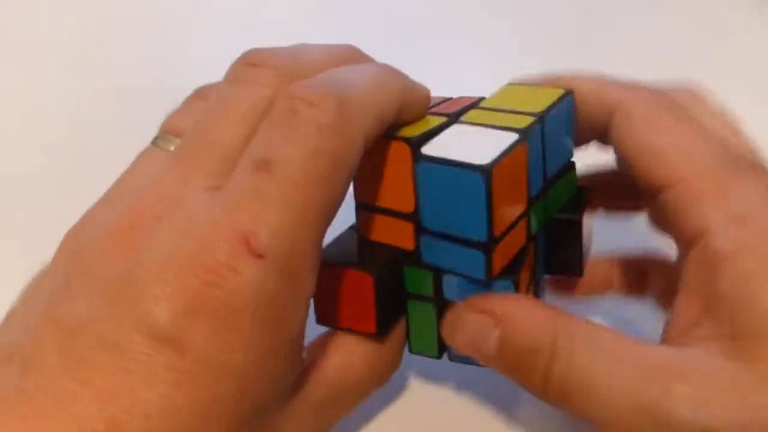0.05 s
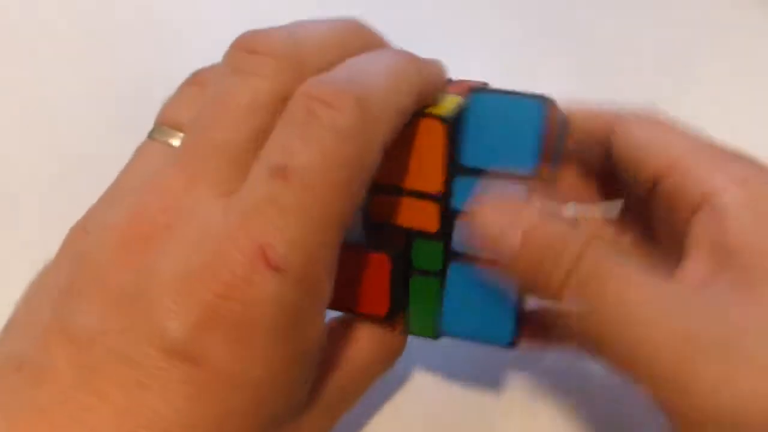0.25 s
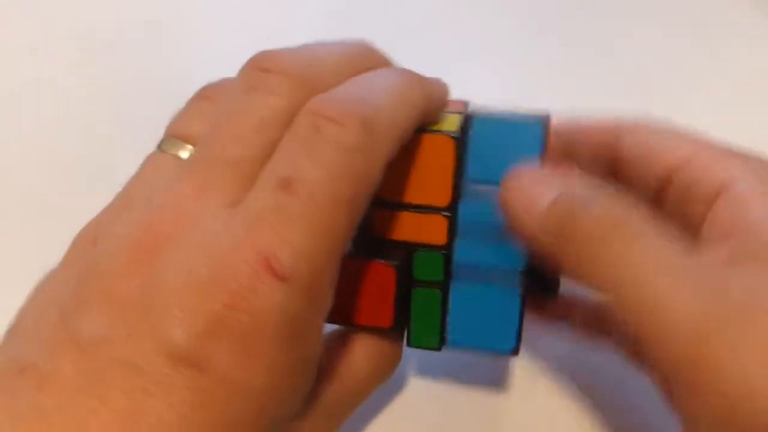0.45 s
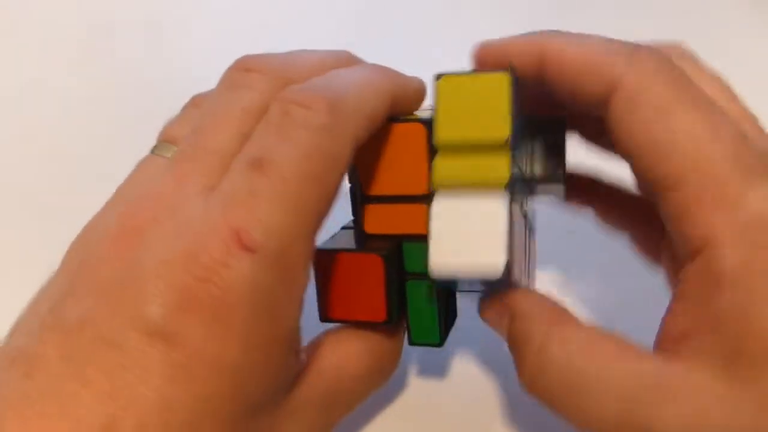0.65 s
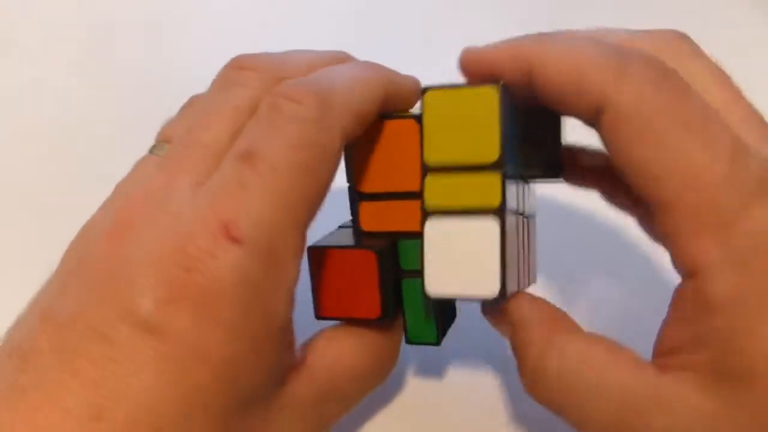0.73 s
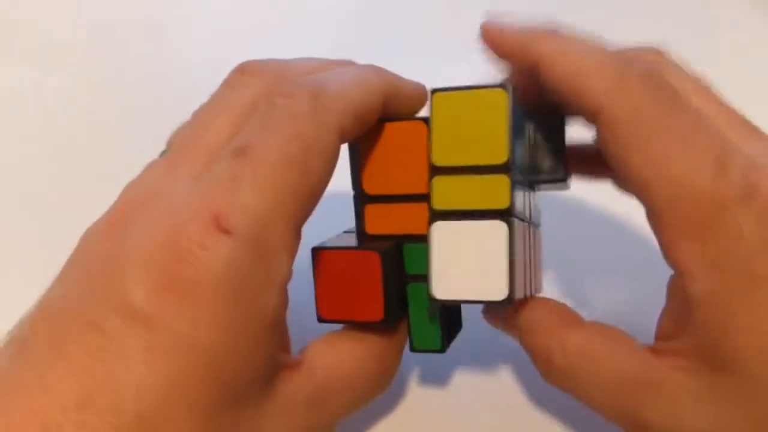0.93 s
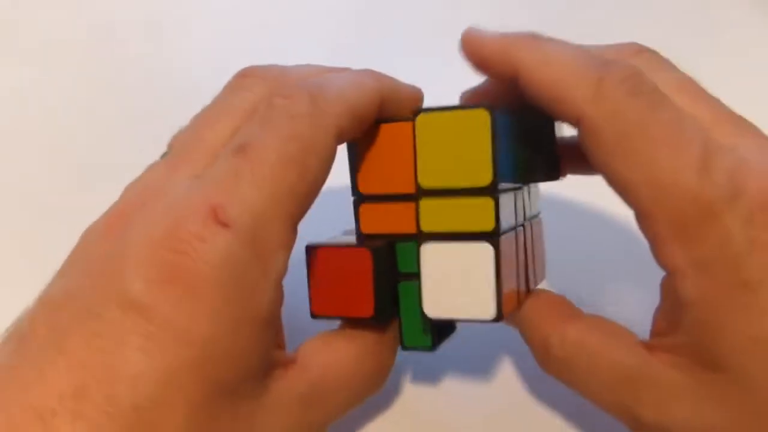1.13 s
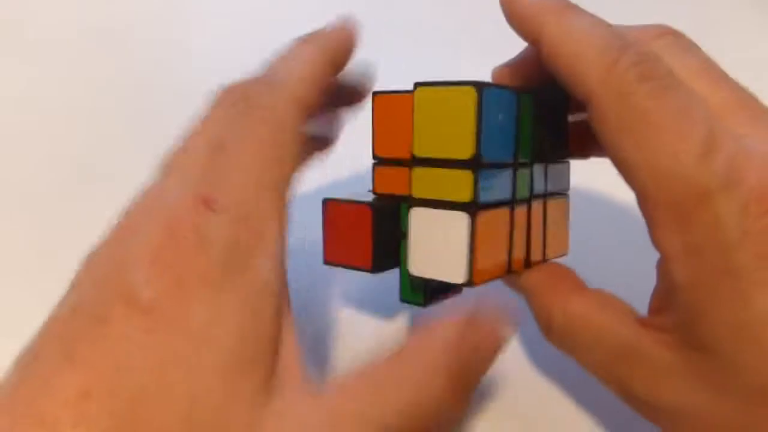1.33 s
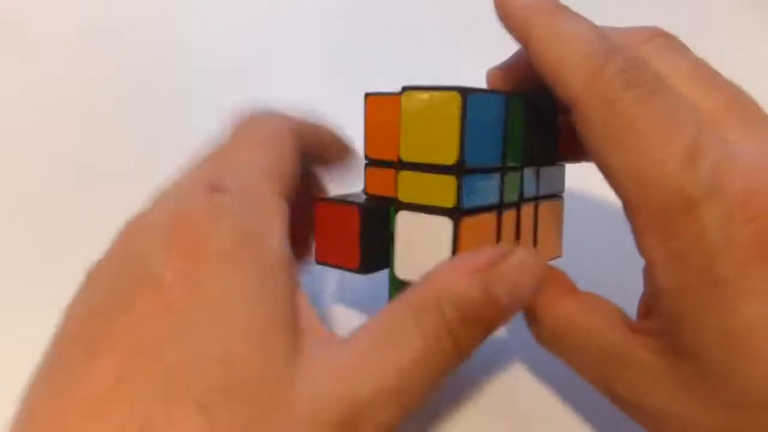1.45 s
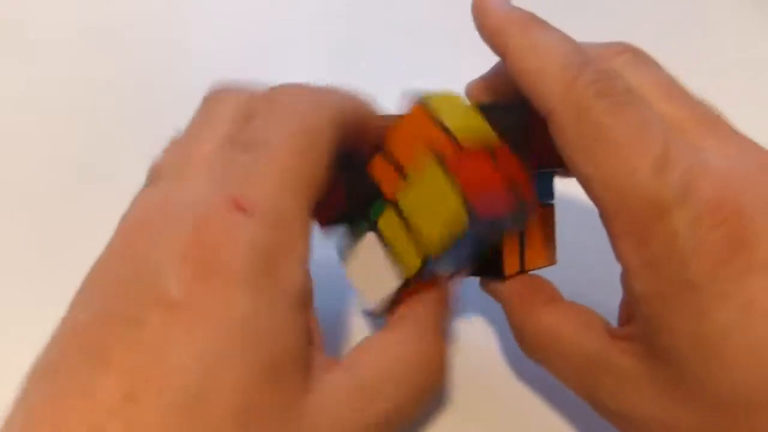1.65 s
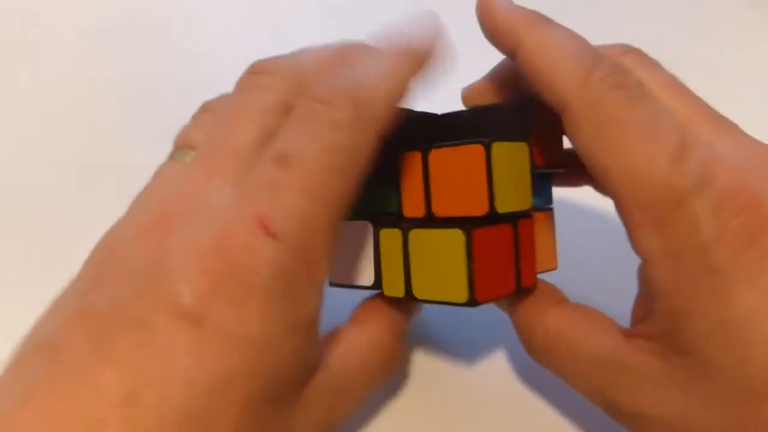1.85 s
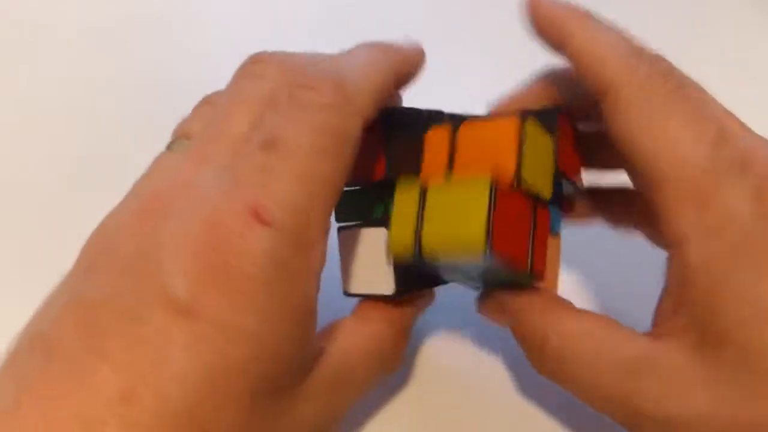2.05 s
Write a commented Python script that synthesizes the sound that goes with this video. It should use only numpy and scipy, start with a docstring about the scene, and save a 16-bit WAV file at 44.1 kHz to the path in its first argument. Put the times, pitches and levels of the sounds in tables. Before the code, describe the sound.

Quick dry clicks and gritty scrapes of plastic puzzle layers build to a sharp clack, pause with light ticks and a soft finger brush, then a second twist snaps; heard close in a quiet room.

```python
"""A plastic twisty puzzle turned in two hands over a table in a quiet room, just in front of a camera.
For 0.75 s hollow pieces click, ringing in three mode groups, and layers scrape in tiny slips; a hard snap at 0.55 s.
Sparse clicks follow; near 1.4 s a finger brushes a face as a swell of hiss; from 1.54 s a second turn snaps at 1.81 s.
A few clicks close it. Three snaps push low on the table; a short room tail and steady air noise lie behind it all."""
import sys
import numpy as np
from scipy import signal
from scipy.fft import rfft, irfft, next_fast_len
from scipy.io import wavfile
from scipy.ndimage import uniform_filter1d, map_coordinates

SR = 44100
rng = np.random.default_rng(int(sys.argv[2]) if len(sys.argv) > 2 else 0)


def wrap_up_sound(samples):
    """Save the sound to the file named by the first command line argument, as 16-bit audio."""
    columns = np.atleast_2d(samples).T
    # keep every value between -1 and 1, then stretch to whole-number steps
    tamed = np.clip(columns, -1, 1)
    steps = np.round(tamed * 32767).astype(np.int16)
    wavfile.write(sys.argv[1], SR, steps)


def ratio(d):
    """dB to gain"""
    e = np.asarray(d, float) / 20
    return 10 ** e


N = 92610


def unit(x):
    """Scale to rms 1."""
    return x / np.sqrt(np.mean(x ** 2) + 1e-20)


def along(points, hz, column=1):
    """Read a column of (frequency [Hz], value, ..) points on a log frequency axis."""
    rows = np.array(points)
    return np.interp(np.log(hz + 1), np.log(rows[:, 0] + 1), rows[:, column])


def filtered(x, response):
    """Filter x by a complex response of frequency."""
    n = x.shape[-1]
    m = next_fast_len(2 * n)
    return irfft(rfft(x, m) * response(np.fft.rfftfreq(m, 1 / SR)), m)[..., :n]


def noise(spectrum):
    """Coloured noise of rms 1."""
    return unit(filtered(rng.standard_normal(N), lambda hz: ratio(along(spectrum, hz))))


def bandpass(f, centre_hz, width_hz):
    """Response of one resonance, 1 at its centre."""
    damping = 1j * f * width_hz
    return damping / (centre_hz ** 2 - f ** 2 + damping)


def pieces(f):
    """Small hollow pieces: three groups of resonances, cut steeply in the bass and gently in the treble."""
    # modes of the pieces, low to high group: (frequency [Hz], width [Hz], level [dB])
    low_modes = [(450, 200, -7.5), (620, 67, -11.5), (810, 170, -11.5), (976, 158, 10), (1375, 210, 9.5),
                 (1590, 220, 2.5)]
    middle_modes = [(2230, 350, -2.5), (2584, 330, 2.5), (3420, 900, -2), (4237, 1100, 0.5),
                    (5050, 270, -6)]
    high_modes = [(6930, 1020, 3.5), (8020, 640, -5), (9830, 1200, -8.5), (11200, 1200, -14),
                  (12800, 680, -21)]
    low_cut_hz, high_cut_hz = 390, 10500  # small pieces radiate little under the first
    ring = [sum(ratio(db) * bandpass(f, hz, width) for hz, width, db in group)
            for group in (low_modes, middle_modes, high_modes)]
    s = 1j * f / low_cut_hz
    bass_cut = (s * s / (s * s + s + 1)) ** 2
    treble_cut = 1 / (1 + 1j * f / high_cut_hz) ** 2
    return np.array(ring) * bass_cut * treble_cut


def spread():
    """Gains of mid and side for each mode group; the side widens towards the treble."""
    side_db = [-21.5, -14, -10.5]
    return ratio([[0, 0, 0], side_db])[..., None]


def clicks():
    """Each contact chatters briefly and rings the three mode groups; a second draw is what differs left to right."""
    # clicks: (time [s], level of low, middle and high modes [dB],
    #          frequency most excited among the low [Hz] and among the middle modes [Hz])
    click_rows = [(0.0128, -40.5, -39, -44, 1430, 5200), (0.0214, -43.5, -35.5, -47, 1500, 3540),
                  (0.0975, -43.5, -48, -49, 1600, 3280), (0.1005, -47, -42.5, -51, 1490, 4400),
                  (0.1728, -55, -54, -58, 1300, 3000), (0.2002, -41, -57, -36, 1490, 3940),
                  (0.2035, -48, -25, -35, 1620, 4230), (0.2156, -31, -35, -45, 1110, 3020),
                  (0.22, -43, -28, -33, 1220, 3850), (0.2297, -33, -36, -25, 1330, 3810),
                  (0.2436, -30.5, -38, -45, 1500, 2690), (0.2473, -43, -59, -43, 1490, 3900),
                  (0.2568, -34.5, -35, -62, 1470, 2570), (0.265, -59, -39, -62, 1480, 2800),
                  (0.2712, -65, -36, -71, 1400, 3200), (0.2896, -54, -52, -65, 1620, 3530),
                  (0.3112, -61, -56, -48, 1410, 2560), (0.319, -42, -52, -38, 1130, 4600),
                  (0.3229, -37, -25.5, -51, 1600, 3720), (0.3611, -45.5, -43, -52, 1480, 2900),
                  (0.3909, -41, -31, -35, 1380, 2880), (0.398, -25, -20, -31, 1650, 3250),
                  (0.415, -21.5, -32.5, -40, 1670, 3150), (0.4337, -69, -48, -64, 1260, 3330),
                  (0.4536, -42, -48, -58, 1360, 2750), (0.4575, -58, -52, -54, 1060, 3590),
                  (0.463, -62, -59, -64, 1460, 3240), (0.4732, -32, -38.5, -55, 1300, 2430),
                  (0.4792, -40.5, -44, -61, 1630, 2400), (0.4917, -35, -39.5, -44, 1660, 4150),
                  (0.5158, -35.5, -28.5, -48, 1170, 4700), (0.5339, -38, -31.5, -45, 910, 2930),
                  (0.5424, -26.5, -35, -44, 1510, 3420), (0.5494, -20.5, -11, -15.5, 1270, 3750),
                  (0.5823, -30, -35, -39, 1190, 3570), (0.5988, -26, -30.5, -39, 1500, 2500),
                  (0.6023, -24.5, -34, -38, 1400, 2300), (0.6282, -65, -56, -53, 1100, 2620),
                  (0.641, -44.5, -58, -54, 1240, 3360), (0.6684, -41.5, -52, -55, 1200, 2340),
                  (0.6904, -37.5, -43.5, -54, 1400, 2860), (0.7238, -56, -50, -54.5, 870, 3400),
                  (0.7368, -42, -44, -61, 1640, 2270), (0.8683, -41.5, -43.5, -53.5, 1140, 2800),
                  (0.8751, -46, -66, -68, 1050, 3400), (0.9755, -55, -54, -68, 1120, 3420),
                  (1.0158, -58, -52, -60, 1300, 2960), (1.046, -47.5, -57, -54, 1440, 2640),
                  (1.0516, -54, -45, -52, 1320, 2820), (1.1974, -49, -55, -61, 1600, 3270),
                  (1.2034, -52, -42.5, -73, 1370, 2390), (1.2142, -50.5, -42.5, -77, 1560, 3370),
                  (1.5356, -41.5, -44.5, -46.5, 960, 3420), (1.5465, -58, -56, -59, 1380, 3500),
                  (1.5771, -44, -42.5, -42, 930, 4050), (1.5885, -42.5, -41, -46, 950, 2630),
                  (1.6483, -52, -56, -48, 1540, 3930), (1.652, -43.5, -37.5, -40.5, 970, 4430),
                  (1.6681, -34, -49, -40, 980, 3580), (1.6746, -39, -62, -52, 1010, 2640),
                  (1.6805, -64, -41, -55, 1360, 2500), (1.6953, -44, -56, -33.5, 1210, 4270),
                  (1.7159, -49, -37.5, -44, 1110, 2930), (1.7343, -48, -62, -52, 1050, 3520),
                  (1.7592, -46.5, -48, -45, 1020, 2620), (1.7895, -52, -42, -44, 1500, 2900),
                  (1.8055, -27, -22, -40.5, 950, 3880), (1.8077, -20.5, -23.5, -21, 1010, 3260),
                  (1.9536, -45.5, -40, -42, 1500, 3500), (2.0107, -42, -50, -54, 1140, 3930),
                  (2.061, -53, -49, -51, 1450, 2850), (2.0734, -63, -40.5, -53, 1290, 3910)]
    rise_s, t60_s = 0.00053, [0.0027, 0.0088, 0.0096]  # chatter of one contact; decay for each mode group
    strike = 2.9  # first touch over the chatter's rms, in the mid alone
    lead_s = .0004  # a contact starts this long before its listed time
    focus_widths = [1, 0.66]  # band a contact favours in the low and middle groups, over its centre
    unfocused = 0.11  # share that reaches all modes of these groups

    rows, t = np.array(click_rows), np.arange(1024) / SR
    first_touch = np.arange(len(t)) == round(2 * rise_s * SR)
    # axes: contact, mid and side, mode group, time
    touch = rng.standard_normal((len(rows), 2, 1, len(t)))
    touch = touch + np.reshape([strike, 0], (2, 1, 1)) * first_touch
    decay = ratio(-60 * t / np.array(t60_s)[:, None])
    chatter = touch * (1 - np.exp(-t / rise_s)) * decay

    def focus(f):
        """A contact's favoured bands; its high group is excited evenly."""
        centres = rows[:, 4:].T[..., None]
        bands = [unfocused + bandpass(f, hz, hz * width) ** 2 for hz, width in zip(centres, focus_widths)]
        return np.stack(bands + [np.ones((len(rows), len(f)))], axis=1)

    rings = filtered(chatter, lambda f: pieces(f) * focus(f)[:, None])
    # the levels refer to the strongest 2 ms of each ring
    peak_power = np.abs(uniform_filter1d(rings ** 2, size=88)).max(-1, keepdims=True)
    levels = ratio(rows[:, None, 1:4, None])
    sound = (rings / np.sqrt(peak_power) * levels * spread()).sum(2)
    out = np.zeros((2, N + len(t)))
    for s, one in zip(rows[:, 0], sound):
        out[:, round((s - lead_s) * SR):][:, :len(t)] += one
    return out[:, :N]


def scrape():
    """Clumped tiny slips between turning layers ring the same modes; in the treble they blur into hiss."""
    # turning layers, before clumping:
    # (time [s], rattle of low modes [dB], middle over low modes [dB], treble hiss [dB])
    scrape_course = [(0, -54, 4, -63), (0.023, -52, -9, -60.5), (.05, -68.5, 3, -69), (.16, -73.5, 6, -71),
                     (0.194, -54, 2, -71), (.205, -56.5, 0, -62), (.225, -46, 11.5, -57),
                     (0.248, -39, -1.5, -68), (.275, -59.5, 8.5, -59), (.325, -47, 4, -53.5),
                     (0.354, -58.5, 10, -65), (.388, -49.5, -29, -64), (0.393, -35, -25, -45),
                     (0.426, -48.5, -2, -65), (.44, -59, -5, -62), (.48, -46, -7, -58),
                     (.505, -55, 5.5, -60), (0.542, -46, 0.5, -51), (.575, -45.5, 4.5, -53),
                     (.61, -51.5, 7, -50), (.64, -51, -3, -56), (.68, -71, 18.5, -66.5),
                     (0.721, -60, 3.5, -62), (.79, -70.5, 2.5, -79), (.96, -71, 0, -77),
                     (.985, -68, 12, -71), (1.01, -85, 10, -72.5), (1.055, -67.5, 19.5, -69),
                     (1.09, -64, -9, -90), (1.185, -74, 0, -78), (1.215, -58, 8, -75), (1.26, -77, -8, -88),
                     (1.51, -97, 0, -79), (1.54, -50.5, 5, -69), (1.563, -70, 9, -57),
                     (1.588, -45.5, -0.5, -61.5), (1.636, -66, -2, -72), (1.652, -54.5, 13, -68),
                     (1.67, -45.5, -7.5, -62), (1.705, -49, 6, -63), (1.745, -53.5, -13, -53),
                     (1.802, -44, 2.5, -63), (1.83, -64, 17.5, -73), (1.9, -64.5, -1.5, -72),
                     (1.95, -82, 4, -78), (1.965, -59, -2, -78), (2.029, -64.5, 3.5, -73),
                     (2.071, -48, -7.5, -56), (2.1, -54, 2, -62)]
    slips_per_s, slip_spread_db = 1800, 4
    clumps_per_s, clump_db = 150, 2.5  # rate and depth of the random level wander
    hiss_grit = 0.25  # share of single slips in the hiss, over the noise

    t, (s, *columns) = np.arange(N) / SR, np.transpose(scrape_course)
    low_db, middle_over_low_db, hiss_db = [np.interp(t, s, c) for c in columns]
    happens = rng.random((2, 1, N)) < slips_per_s / SR
    strength = ratio(slip_spread_db * rng.standard_normal((2, 1, N)))
    slips = happens * strength * np.sign(rng.standard_normal((2, 3, N)))
    slips[:, 2] = hiss_grit * unit(slips[:, 2]) + rng.standard_normal((2, N))
    # a smooth curve through random knots, one for each mode group
    knots = rng.standard_normal((3, 400))
    clump = map_coordinates(knots, np.meshgrid(range(3), t * clumps_per_s, indexing="ij"))
    groups = np.array([[unit(g) for g in side] for side in filtered(slips, pieces)])
    level_db = np.array([low_db, low_db + middle_over_low_db, hiss_db]) + clump_db * clump
    return (groups * ratio(level_db) * spread()).sum(1)


def brush():
    """A finger on a face: a soft swell of skin hiss."""
    # swell of the brush: (time [s], level [dB])
    brush_swell = [(1.35, -75), (1.38, -58), (1.406, -56.5), (1.43, -59), (1.46, -78)]
    # spectrum of skin on plastic: (frequency [Hz], density [dB per Hz])
    skin_spectrum = [(600, -32), (1200, -6), (3500, -5), (8000, -4), (13000, -9), (16000, -11)]
    s, db = np.transpose(brush_swell)
    return ratio(np.interp(np.arange(N) / SR, s, db, -120, -120)) * noise(skin_spectrum)


def thumps():
    """The hardest snaps push once on the table: a low tone that swells fast and dies away."""
    # low pushes through the table: (time [s], level [dB])
    push_rows = [(.40, -63), (.54, -72), (1.808, -57)]
    tone_hz, t60_s, rise_s = 44.7, 0.068, .006
    times, levels_db = np.array(push_rows).T[..., None]
    t = np.arange(N) / SR
    away = np.abs(t - times)  # seconds to or from the peak
    shape = np.where(t > times, ratio(-60 * away / t60_s), np.exp(-away / rise_s))
    return (ratio(levels_db) * shape * np.cos(2 * np.pi * tone_hz * away)).sum(0)


def room(x):
    """Mid and side tails of noise, each frequency dying at its own speed, drawn anew every 50 ms."""
    # decay of the room: (frequency [Hz], t60 [s], starting level [dB])
    room_decay = [(500, 0.15, -4), (1300, 0.095, -1), (3500, 0.11, -1), (9000, 0.11, -3), (15000, 0.2, 0)]
    mid_db, side_db, delay_s = -5, -12.5, .002
    hop = SR // 20
    out = np.zeros((2, N + 2 * SR))
    x, fade = np.pad(x, (hop, 2 * hop)), np.hanning(2 * hop)
    for i in range(0, N + hop, hop):
        hz, t, z = signal.stft(rng.standard_normal((2, SR // 3)), SR, nperseg=128)
        decay_db = along(room_decay, hz, column=2)[:, None] - 60 * t / along(room_decay, hz)[:, None]
        tail = signal.istft(z * ratio(decay_db), SR, nperseg=128)[1]
        tail = tail / np.linalg.norm(tail[0])
        wet = signal.fftconvolve((x[i:i + 2 * hop] * fade)[None], tail, axes=1)
        out[:, i + round(delay_s * SR):][:, :wet.shape[1]] += wet
    return out[:, hop:hop + N] * ratio([[mid_db], [side_db]])


def air():
    """Steady background of the quiet room: independent coloured noises in mid and side."""
    # spectra of the mid and of the side: (frequency [Hz], density [dB per Hz])
    mid_spectrum = [(15, -45), (30, -20), (90, -19), (150, -6), (263, -0.5), (503, -9.5), (796, -9.5),
                    (2910, -18), (3620, -16.5), (9070, -21), (14000, -21), (16000, -34)]
    side_spectrum = [(15, -40), (30, -17), (90, -19.5), (270, -8.5), (887, -2.5), (1330, -4.5),
                     (8140, -22.5), (11900, -23.5), (14800, -27), (16000, -51.5)]
    mid_db, side_db = -59, -57
    return np.array([ratio(mid_db) * noise(mid_spectrum), ratio(side_db) * noise(side_spectrum)])


def scene():
    """Puzzle, room and air as mid and side, then left and right."""
    pan_db = -1.1  # left over right, for the mid
    near = clicks() + scrape()
    near[0] += brush()
    mid, side = near + room(near[0]) + air()
    mid = mid + thumps()
    left = mid * ratio(pan_db / 2) + side
    right = mid * ratio(-pan_db / 2) - side
    return np.array([left, right])


def band_limit(x):
    """A steep low-pass at the top of the band."""
    return signal.sosfilt(signal.butter(12, 16650, fs=SR, output="sos"), x)


def record(dry):
    """The camera takes the sound in with a steep band limit."""
    top_hz = 15500
    mix = filtered(dry, lambda hz: 1 / (1 + (hz / top_hz) ** 40))
    return band_limit(mix)


dry = scene()
out = record(dry)
wrap_up_sound(out)
```